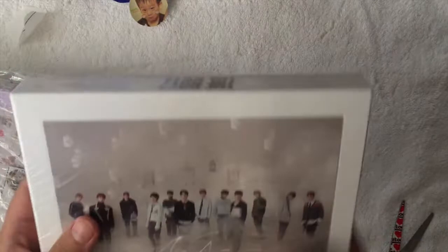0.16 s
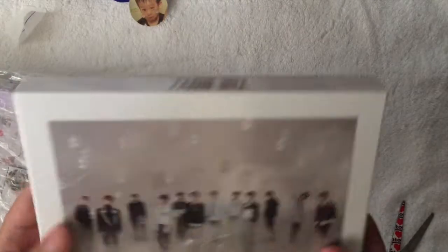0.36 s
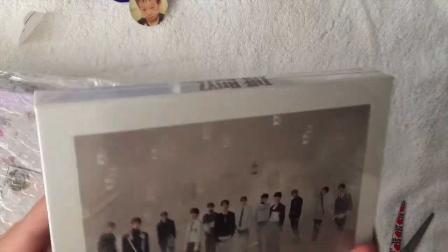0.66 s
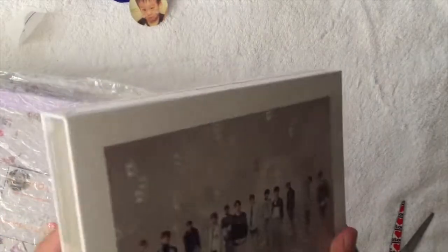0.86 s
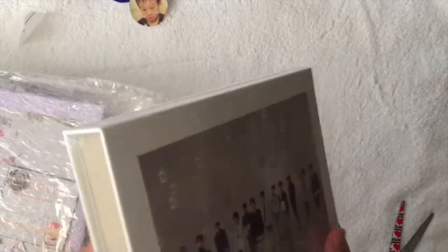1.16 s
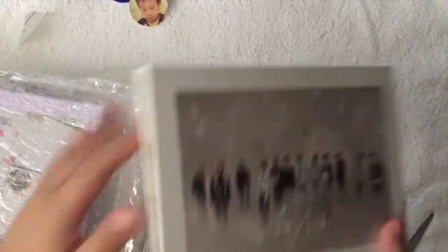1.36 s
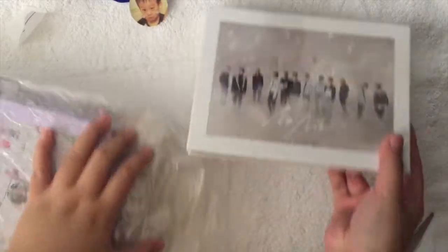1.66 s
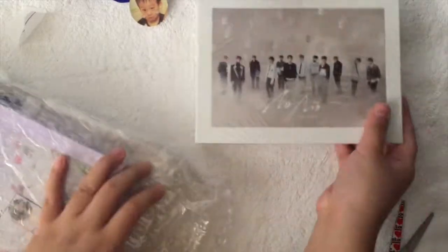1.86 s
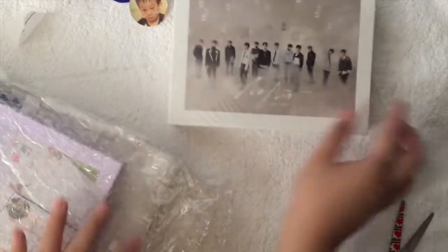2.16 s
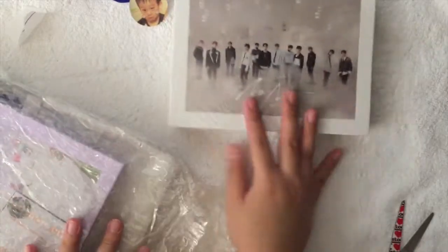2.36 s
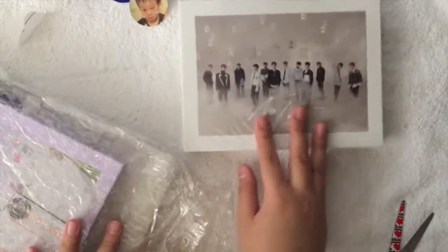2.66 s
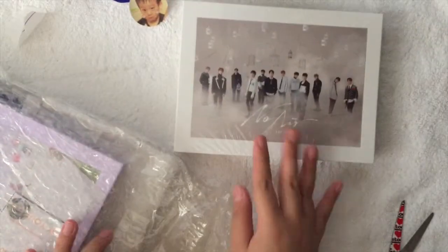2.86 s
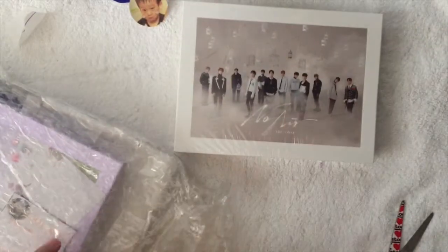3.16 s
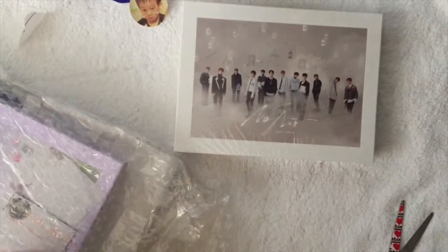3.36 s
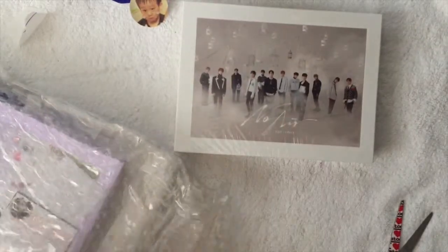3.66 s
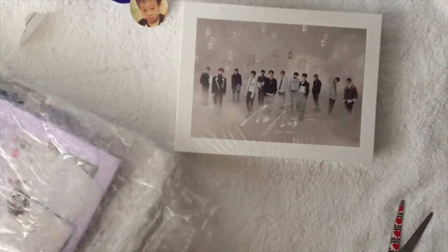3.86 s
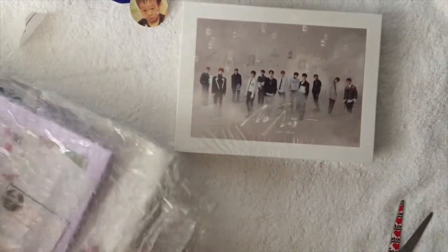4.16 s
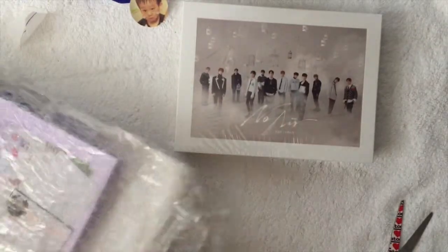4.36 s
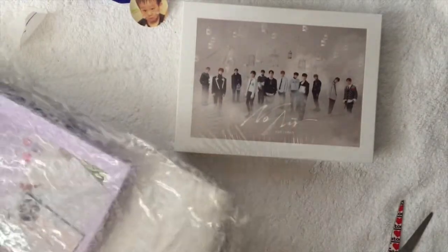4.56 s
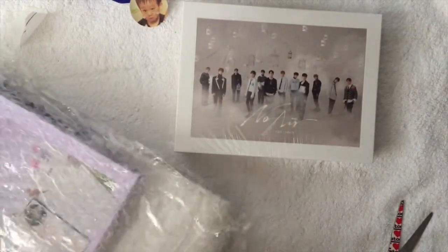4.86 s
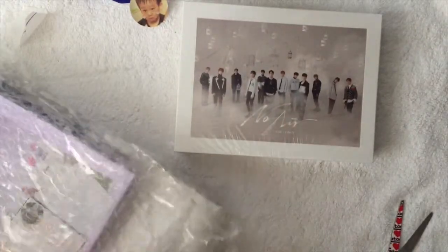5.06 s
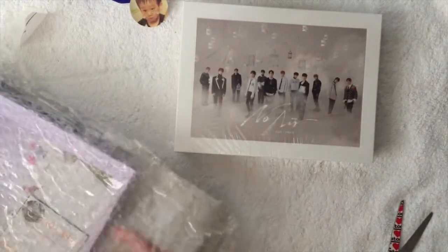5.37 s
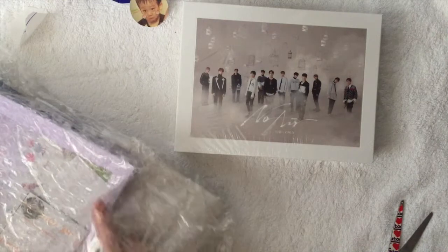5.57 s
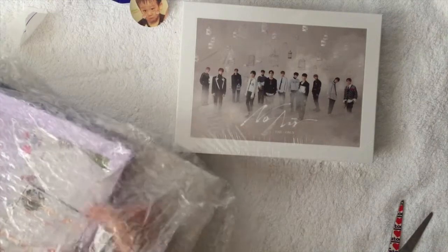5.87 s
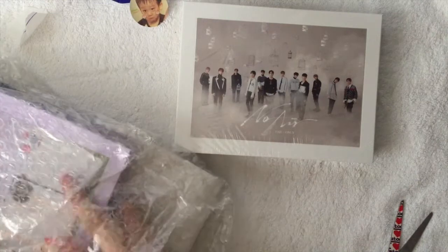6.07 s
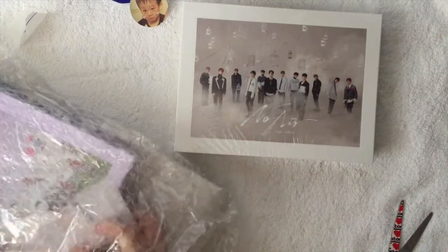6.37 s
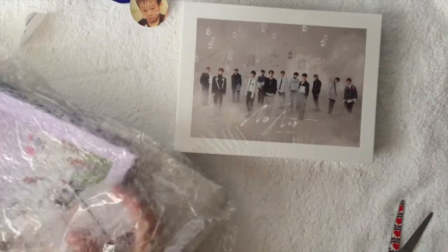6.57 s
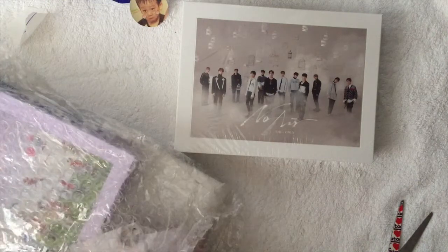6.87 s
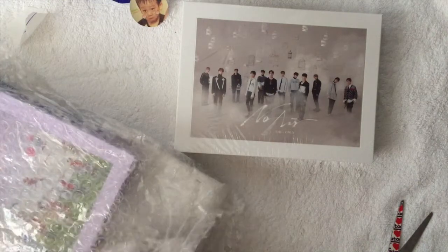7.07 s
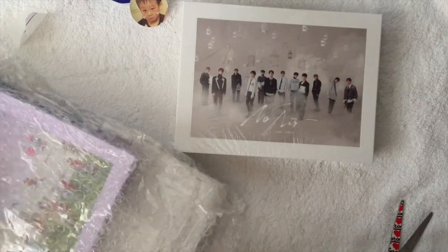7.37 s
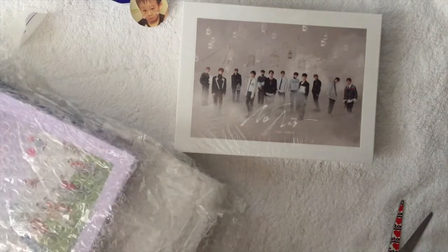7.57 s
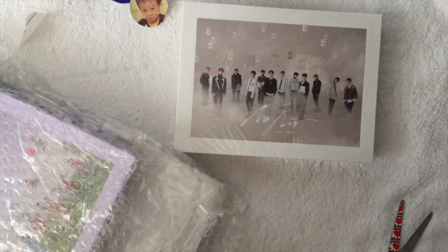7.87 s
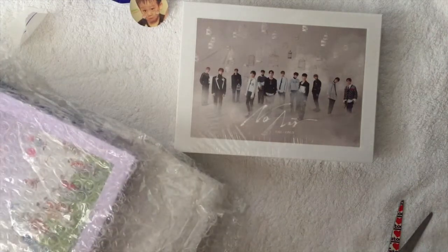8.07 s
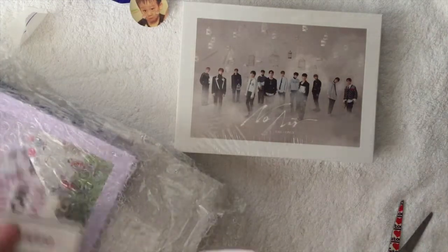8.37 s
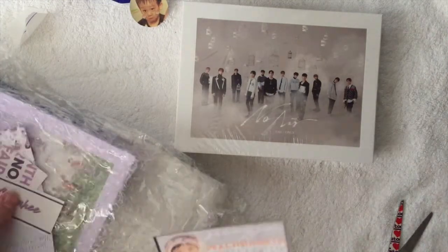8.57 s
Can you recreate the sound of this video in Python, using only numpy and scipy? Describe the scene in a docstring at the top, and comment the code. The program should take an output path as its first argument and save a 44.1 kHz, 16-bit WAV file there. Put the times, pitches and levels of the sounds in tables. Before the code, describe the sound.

Thin plastic crinkles close to the microphone in a small, quiet room. It begins softly, with fingers brushing a box wrapped in film, then turns into uneven bursts of louder crackling as a bag of parcels is searched. Creases tick, wider folds snap and the packages knock dully now and then. After a short lull come light scrapes and a last crinkle, over faint hum and hiss.

```python
"""Shrink-wrapped box and parcel bag

Hands turn and rub a shrink-wrapped box over a soft table cover, then rummage in a plastic bag of parcels.
The film buckles in thousands of tiny pops; wide folds snap, fine creases tick, parcels bump dully.
A small furnished room answers. A low rumble wavers over microphone hiss."""
import sys
import numpy as np
from scipy import signal
from scipy.fft import rfft, irfft, next_fast_len
from scipy.io import wavfile
from scipy.ndimage import uniform_filter1d, map_coordinates

SR = 44100
rng = np.random.default_rng(int(sys.argv[2]) if len(sys.argv) > 2 else 0)


def output_pcm(signal):
    """Save a mono or channel-first signal as 16-bit PCM at the path in sys.argv[1].

    Samples are clipped to [-1, 1] before scaling.
    """
    pcm = np.clip(np.atleast_2d(signal).T, -1, 1) * 32767
    wavfile.write(sys.argv[1], SR, np.round(pcm).astype(np.int16))


N = 384243

# rumble envelope (time [s], level [dB])
RUMBLE_LEVEL = [(0.0, -72), (0.09, -61.5), (0.41, -67.5), (0.61, -58.5), (0.72, -71.5), (1.79, -64.5),
                (2.15, -62), (2.64, -69), (2.95, -64.5), (4.19, -69), (5.0, -59.5), (5.85, -65.5),
                (6.1, -69.5), (7.66, -63.5), (7.74, -72), (7.84, -59.5), (8.22, -67.5), (8.27, -58),
                (8.71, -61)]
# background spectra (frequency [Hz], relative density [dB])
RUMBLE_SPECTRUM = [(25, -59), (40, -18), (52, -22), (59, -6.5), (66, -4), (78, -7), (95, -10.5),
                   (123, -9.5), (150, -17.5), (260, -38), (400, -76)]
HISS_SPECTRUM = [(120, -20.5), (200, 3.5), (373, -15.5), (791, -15), (933, -12), (1500, -39), (2170, -19),
                 (4860, -24), (6280, -48), (7540, -27.5), (12800, -31), (16000, -65)]
# room decay (frequency [Hz], T60 [s])
ROOM_T60 = [(200, 0.25), (2000, 0.059), (10000, 0.072)]
# parcel contacts (time [s], level [dB], pitch [Hz])
PARCEL_BUMPS = [(1.327, -53.5, 228), (1.554, -47, 355), (1.609, -47, 310), (2.108, -44.5, 134),
                (2.309, -52.5, 212), (2.418, -41.5, 194), (3.338, -48, 303), (3.59, -42, 322),
                (4.555, -42, 300), (5.03, -38, 288), (5.58, -38, 296), (5.736, -47.5, 129),
                (5.998, -48, 273), (6.16, -39, 288), (6.27, -39, 307), (6.626, -42.5, 340),
                (7.221, -47, 122), (7.489, -48, 325)]
# rubs and slides: fingers on the box, a stiffer packet near 7.15-7.6 s, a card sliding near 8.2-8.4 s (time
# [s], length [s], resonance [Hz], bandwidth [Hz], level [dB])
RUBS = [(0.121, 0.023, 2180, 900, -58.5), (0.242, 0.033, 990, 204, -69),
        (0.513, 0.036, 1800, 1220, -80), (0.667, 0.067, 925, 70, -62), (1.325, 0.08, 650, 302, -61),
        (1.335, 0.11, 1150, 400, -64.5), (7.152, 0.28, 3470, 1500, -62),
        (7.404, 0.18, 3440, 1100, -56), (7.793, 0.089, 6300, 1200, -68),
        (8.2, 0.14, 13800, 4000, -59), (8.253, 0.041, 2270, 350, -58), (8.255, 0.12, 1590, 160, -68),
        (8.251, 0.045, 5700, 1600, -54.5), (8.306, 0.048, 6100, 1500, -52),
        (8.332, 0.034, 2190, 400, -58.5), (8.393, 0.024, 2080, 350, -51),
        (8.433, 0.0088, 800, 250, -52), (8.606, 0.069, 3850, 1200, -52)]
# four rustle bands: wide folds, fine creases, crisp edge, bag air (frequency [Hz], relative density [dB])
FOLD_SPECTRUM = [(260, -10), (450, -30), (600, -4.5), (1010, -1), (1430, -2), (2040, 0), (2500, -7),
                 (3100, -13), (3900, -91)]
CREASE_SPECTRUM = [(2200, -41), (2800, -13), (3200, -6), (3760, 0), (4300, -2.5), (4850, -7.5), (5400, 1),
                   (6100, 0), (7000, -5), (7700, -27), (9000, -43)]
EDGE_SPECTRUM = [(4410, -14), (7500, -6.5), (8930, 2.5), (10300, -6.5), (11200, -2.5), (13800, -2.5),
                 (15700, -6), (16400, -42)]
AIR_SPECTRUM = [(88, -31), (150, -18), (200, -8.5), (290, 3), (381, -4), (520, -8.5), (680, -13.5),
                (1140, -120)]
# grips (time [s], hold [s], fold drive [dB], creases re folds [dB], edge re folds [dB], air re folds [dB])
FILM_GRIPS = [(0.0, 0.031, -68, 1, -7, 3), (0.11, 0.025, -70.5, 3.5, -5, 3),
              (0.272, 0.0065, -70.5, 2.5, -2, 6), (0.412, 0.0083, -75, -6, 3, 12.5),
              (0.525, 0.018, -74.5, -6, -18, -2), (1.344, 0.037, -77, -12, -21, 10.5),
              (1.569, 0.055, -53, -1, -2.5, -9), (1.675, 0.064, -47, -2.5, -9.5, -5),
              (1.753, 0.1, -53.5, -6.5, -15, -20), (1.834, 0.28, -62, 0, -4.5, -27),
              (2.087, 0.041, -60.5, -15, -19, -2.5), (2.355, 0.036, -62.5, -1, -9, -1),
              (2.405, 0.057, -50, -1, -3.5, -8), (2.481, 0.046, -48.5, -8, -15, -10),
              (2.623, 0.11, -70.5, -8, -10, -21), (2.795, 0.0088, -69, 3, -3, -8),
              (2.873, 0.071, -66, 1.5, 0.5, -4.5), (3.001, 0.091, -59.5, 2, -3.5, -6),
              (3.134, 0.16, -59.5, 3, -6, -14), (3.356, 0.063, -49, 2, 1, -4),
              (3.503, 0.11, -57, 0.5, 0, -4.5), (3.578, 0.16, -51.5, 3.5, 0.5, -5),
              (3.779, 0.04, -47, 1.5, -3.5, -9), (3.843, 0.07, -44, -3, -6.5, -13.5),
              (3.958, 0.15, -47.5, -0.5, -3.5, -6), (4.125, 0.032, -52.5, -6, -11, -19),
              (4.19, 0.15, -49.5, -3, -9.5, -7), (4.381, 0.06, -56, -4, -9, -13),
              (4.45, 0.064, -46, 0, -6, -13), (4.54, 0.056, -41.5, -2, -5.5, -7.5),
              (4.728, 0.19, -51, -1, -4.5, -10.5), (4.945, 0.03, -51.5, -2, -4, -29),
              (5.014, 0.1, -44, -2, -7, -13), (5.189, 0.17, -49, -1, -5.5, -14),
              (5.38, 0.1, -44.5, -0.5, -6.5, -12.5), (5.526, 0.0083, -48, 1.5, -10, -15),
              (5.572, 0.15, -50.5, 0, -3.5, -7.5), (5.733, 0.047, -59.5, 2, -5, -8),
              (5.827, 0.049, -53, 2.5, -5.5, -12), (5.945, 0.242, -52, 0, -7.5, -12.5),
              (6.198, 0.05, -67, 2, -7, -12), (6.281, 0.0083, -50, -3.5, -8, -13),
              (6.341, 0.075, -55, 1.5, -4, -22), (6.502, 0.21, -58.5, -0.5, -7.5, -7),
              (6.696, 0.09, -56.5, 1.5, -6, -25), (6.801, 0.14, -51, 0.5, -5.5, -21),
              (6.981, 0.0082, -59, -1, -8, -8), (7.101, 0.025, -64.5, -2.5, -8, -10),
              (7.167, 0.091, -51, -5, -11, -16), (7.282, 0.11, -56, -2.5, -9.5, -2.5),
              (7.43, 0.13, -56, -3, -2.5, -8.5), (7.801, 0.1, -72, -0.5, 1, 0),
              (8.126, 0.0047, -61, -0.5, -2.5, 3), (8.202, 0.047, -78, 11.5, 16.5, -12),
              (8.26, 0.015, -82, 9, 24, -17), (8.322, 0.025, -75.5, 17.5, 20.5, -17),
              (8.4, 0.012, -59.5, -9, -9, -2.5), (8.554, 0.028, -61.5, -4, -14, -2),
              (8.642, 0.021, -57, 4, -5, -14)]
# drive with the film at rest in the hands (folds [dB], creases [dB], edge [dB], air [dB])
REST_DRIVE_DB = [-82.5, -81, -87.5, -79.5]
# rustle balance (time [s], small re wide folds [dB])
FOLD_BALANCE = [(1.4, 13), (1.6, -7), (2.2, 5), (2.7, 5), (3.0, 17.5), (3.7, 16.5), (4.0, -9.5), (5.0, 3.5),
                (5.8, 3), (6.4, -6), (7.0, 7), (7.4, -4)]
# fine creases cracking (time [s], level [dB], ring [Hz], edge re level [dB])
CREASE_TICKS = [(0.4061, -41, 4100, -8), (0.5335, -61, 3900, -17), (0.751, -44.5, 3830, -16),
                (1.5543, -44, 6400, -9), (1.562, -36.5, 5800, -21), (1.6267, -36.5, 4250, -9),
                (1.654, -39, 6500, -12), (1.685, -31.5, 5470, -6.5), (1.6917, -32, 4550, -17),
                (1.7588, -38, 4360, -9), (1.7675, -29, 5500, -18), (1.786, -30, 5840, -10.5),
                (1.8984, -39.5, 3500, -12.5), (1.931, -37.5, 3820, -12), (1.9646, -31, 5300, -12),
                (1.9994, -37, 5240, -21), (2.018, -42, 5460, -18), (2.0876, -27, 4180, -13.5),
                (2.3426, -43, 4020, -23), (2.4175, -34, 6150, -10), (2.4496, -31, 4130, -8),
                (2.536, -38, 6000, -31), (2.607, -44, 5840, -23), (2.643, -47.5, 5770, -11),
                (2.6816, -45.5, 4330, -30), (2.877, -52, 4130, 4), (2.8807, -49, 4600, 6.5),
                (2.9068, -43, 3650, -3), (2.9886, -38, 4150, -27), (3.0018, -36, 5240, -26),
                (3.2198, -29.5, 6000, -26), (3.271, -39, 5700, -23), (3.348, -40, 5440, -18),
                (3.368, -34, 5570, -19), (3.499, -38, 5990, -19), (3.6804, -37, 6530, -12),
                (3.7205, -30, 5900, -7), (3.7284, -32, 6100, -13), (3.7768, -38, 3690, -22),
                (3.85, -27, 5800, -25), (3.924, -31, 5400, -13), (4.0482, -34.5, 5570, -18),
                (4.064, -37, 6040, -16), (4.102, -35, 6190, -7), (4.234, -32, 3820, -15),
                (4.309, -35, 3470, -8), (4.396, -35, 3730, -20), (4.47, -34, 5240, -5),
                (4.5566, -27, 3900, -8), (4.73, -37, 5900, -26), (4.7706, -52, 5600, -24),
                (5, -38, 5500, -2), (5.0552, -27, 3730, -13), (5.233, -42, 5560, -20),
                (5.376, -38, 3900, -4), (5.409, -36, 5500, -7), (5.4152, -24, 4060, -23),
                (5.527, -34, 6340, -21), (5.5798, -25.5, 6000, -19), (5.599, -30.5, 5860, -15),
                (5.8503, -38, 6200, -7), (5.933, -37, 4000, -16), (6.0114, -31.5, 3900, -7),
                (6.0547, -36, 5280, -18), (6.105, -33, 5940, -11), (6.114, -35, 3900, -6),
                (6.162, -31.5, 6300, -12), (6.2828, -39, 5660, -5), (6.357, -31.5, 5800, -14),
                (6.581, -36, 3940, -20), (6.6186, -30, 6170, -12), (6.731, -32, 5470, -12),
                (6.76, -35.5, 6610, -12), (6.8192, -36, 3780, -21), (6.86, -36, 6150, -20),
                (6.892, -31, 5530, -5), (6.976, -49, 5500, -10), (7.099, -53.5, 3900, -11),
                (7.176, -37, 5700, -15), (7.2186, -30, 6400, -36), (7.22, -22, 3770, -40),
                (7.234, -45, 6470, -22), (7.242, -47, 6000, -22), (7.308, -44, 4240, -26),
                (7.3357, -40, 5500, -22), (7.417, -46, 3700, -26), (7.486, -32, 3440, -27),
                (7.553, -38, 3650, -10), (8.3356, -48, 6200, 9), (8.6064, -48, 4070, -24),
                (8.6542, -38, 4400, -10), (8.64, -35.5, 4500, -24), (8.66, -30.5, 4470, -22),
                (8.6704, -32, 3360, -20)]
# taps on the box (rows before 0.3 s), then wide folds snapping (time [s], level [dB], pitch [Hz], after-ring
# [Hz], after-ring at 3 ms re level [dB])
FOLD_SNAPS = [(0.0305, -48, 1520, 770, -8.5), (0.0812, -46, 1980, 745, -2.5), (0.2765, -46, 2100, 960, -9),
              (0.407, -47.5, 1730, 1730, -13), (0.7528, -53, 1890, 1810, -2.5),
              (1.7684, -33.5, 1810, 920, -20), (1.7873, -34.5, 1630, 2150, -27),
              (1.9372, -36, 1600, 1220, -18), (1.9657, -41, 1500, 960, -18), (2.0893, -24, 1470, 914, -17),
              (2.4515, -39, 1860, 1040, -20), (2.4989, -26.5, 1530, 1030, -16.5),
              (2.8838, -47, 1520, 1440, -12), (3.003, -36.5, 1850, 2330, -18),
              (3.2206, -35.5, 1850, 1920, -23), (3.3496, -27, 1840, 1430, -18),
              (3.7761, -31, 1720, 1360, -24), (3.8508, -32, 1730, 2120, -18),
              (3.9048, -32, 1470, 1960, -20), (4.0008, -28, 1710, 1480, -13), (4.3159, -31, 1560, 940, -19),
              (4.4729, -22, 1210, 960, -10), (4.5583, -22.5, 1660, 1060, -8), (4.8617, -30, 1510, 790, -16),
              (5.0564, -26.5, 1330, 1340, -11), (5.0907, -27, 1370, 1040, -14),
              (5.2998, -28.5, 1400, 1060, -13), (5.366, -28.5, 1610, 1520, -11),
              (5.3862, -28, 1390, 1100, -13), (5.5831, -25, 1180, 810, -16.5),
              (5.6617, -35, 1710, 1570, -11), (6.0827, -35, 1640, 1640, -25),
              (6.273, -35.5, 1000, 780, -10.5), (6.2859, -38, 1440, 1470, -7),
              (6.3745, -34.5, 1400, 2060, -21), (6.5047, -44, 1470, 1310, -8),
              (6.5819, -37, 1580, 735, -13), (6.6203, -31.5, 1760, 1350, -18),
              (7.2201, -20, 1856, 950, -17.5), (7.238, -34, 1100, 1010, -14),
              (7.3096, -30.5, 1550, 1570, -16), (7.4879, -34.5, 1850, 2070, -9),
              (7.8663, -46.5, 1280, 1110, -11), (8.1218, -38, 1590, 1320, -11),
              (8.1256, -36, 1440, 2310, -16), (8.3952, -36.5, 1780, 1870, -17),
              (8.4023, -39, 1920, 2040, -7), (8.4066, -44, 2110, 1780, -21),
              (8.527, -38.5, 1450, 1060, -10)]


def amp(db):
    """dB to gain."""
    return 10 ** (np.asarray(db) / 20)


def unit(x):
    """Scale to rms 1."""
    return x / np.sqrt(np.mean(x ** 2) + 1e-20)


def columns(table):
    """Columns as vertical vectors, one row per event."""
    return np.transpose(table)[:, :, None]


def along(points, hz):
    """Interpolate (Hz, value) points over log frequency."""
    knots_hz, values = np.transpose(points)
    return np.interp(np.log(hz + 1), np.log(knots_hz + 1), values)


def curve(points):
    """Interpolate (s, value) points per sample."""
    return np.interp(np.arange(N) / SR, *np.transpose(points))


def wobble(rate_hz):
    """Smooth random curve, rate_hz knots per second."""
    knots = rng.standard_normal(int(N * rate_hz / SR) + 4)
    return map_coordinates(knots, [np.arange(N) * rate_hz / SR])


def coloured(x, spectrum):
    """Zero-phase spectral shaping, rms 1."""
    size = next_fast_len(len(x) + 8192)
    gain = amp(along(spectrum, np.fft.rfftfreq(size, 1 / SR)))
    return unit(irfft(rfft(x, size) * gain, size)[:len(x)])


def scatter(starts, bursts):
    """Sum bursts, one per row, at their start samples."""
    at = starts[:, None] + np.arange(bursts.shape[1])
    return np.bincount(at.ravel(), bursts.ravel(), N + SR)[:N]


def rumble(hum_hz=59, hum_re_noise_db=-2):
    """Low noise and a hum of wandering phase; the level wavers."""
    phase = 2 * np.pi * hum_hz * np.arange(N) / SR + 1.56 * wobble(10)
    hum = np.sqrt(2) * amp(hum_re_noise_db) * np.sin(phase)
    level_db = curve(RUMBLE_LEVEL) + 2.4 * wobble(5.5)
    return amp(level_db) * unit(hum + coloured(rng.standard_normal(N), RUMBLE_SPECTRUM))


def mic_hiss(level_db=-75):
    """Near-steady microphone noise."""
    return amp(level_db + 0.37 * wobble(14)) * coloured(rng.standard_normal(N), HISS_SPECTRUM)


def room(x, delay_samples=130):
    """Small-room reverb: each frequency dies at its own rate."""
    hz, t, noise = signal.stft(rng.standard_normal(SR // 2), SR, nperseg=256)
    decay = amp(-60 * t / along(ROOM_T60, hz)[:, None])
    tail = signal.istft(noise * decay, SR, nperseg=256)[1]
    return signal.fftconvolve(np.pad(x, (delay_samples, 0)), tail / np.linalg.norm(tail))[:N]


def parcel_bumps(rise_s=0.0011, decay_cycles=1.85):
    """Soft contacts: each a low push that dies in a few cycles."""
    time_s, db, hz = columns(PARCEL_BUMPS)
    t = np.arange(3000) / SR
    envelope = np.exp(-t * hz / decay_cycles) * (1 - np.exp(-t / rise_s))
    push = envelope * np.sin(2 * np.pi * hz * t)
    return scatter(np.round(time_s[:, 0] * SR).astype(int), amp(db + 3) * push)


def rubs():
    """Friction noise through one resonance; fast attack, slow fade."""
    out = np.zeros(N + SR)
    for time_s, length_s, hz, width_hz, db in RUBS:
        n = round(length_s * SR)
        progress = np.arange(n) / SR / length_s
        stroke = np.clip(progress / 0.039, 0, 1) * (1.5 - progress) / 1.72
        b, a = signal.iirpeak(hz, hz / width_hz, SR)
        friction = signal.lfilter(b, a, signal.lfilter(b, a, rng.standard_normal(SR // 2)))[-n:]
        out[round(time_s * SR):][:n] += amp(db) * stroke * unit(friction)
    return out[:N]


def grip_drives_db(rise_db_per_s=442, fall_db_per_s=648, creep_db_per_s=129):
    """Drive of folds, creases, edge and air: grips rise, hold and let go; the film creeps back."""
    t = np.arange(0, N + 64, 64) / SR
    time_s, hold_s, fold_db, *offsets_db = columns(FILM_GRIPS)
    released_s = np.maximum(t - time_s - hold_s, 0)
    held_db = fold_db - rise_db_per_s * np.maximum(time_s - t, 0)
    drives_db = []
    for rest_db, creep_db, offset_db in zip(REST_DRIVE_DB, (-10, -10.5, -13, -23), [0] + offsets_db):
        fall_db = np.maximum(-fall_db_per_s * released_s, creep_db - creep_db_per_s * released_s)
        power = amp(2 * rest_db) + amp(2 * (held_db + offset_db + fall_db)).sum(axis=0)
        drives_db.append(np.interp(np.arange(N) / SR, t, 10 * np.log10(power)))
    drives_db[3] += 3.5 * wobble(9.8)  # bag air puffs unevenly
    return drives_db


def balance_folds(x, crossover_hz=1460):
    """Handling shifts the balance of wide and small folds."""
    wide = signal.sosfilt(signal.butter(2, crossover_hz, fs=SR, output="sos"), x)
    small = signal.sosfilt(signal.butter(2, crossover_hz, "high", fs=SR, output="sos"), x)
    gain = amp(curve(FOLD_BALANCE) / 2)
    return wide / gain - small * gain


def patchy(x, depth_db):
    """Each crease rings its own way: random gain over time and frequency."""
    bins = signal.stft(x, nperseg=256)[2]
    field = uniform_filter1d(rng.standard_normal(bins.shape), size=3, axis=0)
    field = uniform_filter1d(field, size=6, axis=1)
    return signal.istft(bins * amp(depth_db * unit(field)), nperseg=256)[1][:N]


def film_flips(level_db, median_hz, width_cycles, count):
    """Bits of film flip at random: a cycle or two each, few big, many small."""
    when, rank, phase = columns(rng.random((count, 3)))
    hz = median_hz * np.exp(0.24 * rng.standard_normal((count, 1)))
    cycles = hz * np.arange(-80, 80) / SR
    strength = amp(-4 * np.log(np.maximum(rank, 0.12)))
    flips = strength * np.exp(-(cycles / width_cycles) ** 2) * np.sin(2 * np.pi * (cycles + phase))
    return amp(level_db) * unit(scatter((when[:, 0] * N).astype(int), flips))


def film_crackle(count=9000, pop_samples=200):
    """Random buckling over film-on-film sliding; each pop sounds in all four bands at random shares."""
    when, rank, width = rng.random((count, 3)).T
    starts = (when * N).astype(int)
    strength_db = -5.5 * np.log(np.maximum(rank, 0.08))  # few big, many small
    width_s = 0.00015 * amp(9.7 * width[:, None])
    age = np.arange(pop_samples) / SR / width_s
    swell = age ** 2 * np.exp(-(age / 1.53) ** 2)  # each tiny pop swells and fades softly
    clumping = amp(0.72 * wobble(30))
    drives_db = grip_drives_db()
    force = np.clip((drives_db[0][starts] + 72.5) / 22, 0.1, 1)  # light touch: even pops
    spectra = FOLD_SPECTRUM, CREASE_SPECTRUM, EDGE_SPECTRUM, AIR_SPECTRUM
    out = np.zeros(N)
    for spectrum, drive_db, slide_gain in zip(spectra, drives_db, (1.03, 0.76, 0.93, 2.9)):
        share_db = np.clip(3.2 * rng.standard_normal(count), -8, 3.5)
        gain = amp(force * (strength_db - 11.5 + share_db))[:, None]
        pops = unit(scatter(starts, gain * swell * rng.standard_normal((count, pop_samples))))
        slide = slide_gain * amp(1.24 * wobble(40)) * rng.standard_normal(N)
        band = coloured(clumping * (pops + slide), spectrum)
        if spectrum is FOLD_SPECTRUM:
            band = balance_folds(band)
        out += amp(drive_db - 4.5) * band
    out += film_flips(drives_db[0] - 7.5, median_hz=1450, width_cycles=0.5, count=1100)
    out += film_flips(drives_db[1] - 8, median_hz=5200, width_cycles=0.52, count=1300)
    return patchy(out, depth_db=2.5)


def crease_ticks(rise_s=0.00093, ring_t60_s=0.0026, spit_t60_s=0.0059, edge_t60_s=0.0031):
    """Fine creases crack: a short ring, a spit of noise around its pitch, a crisp edge."""
    time_s, db, hz, edge_db = columns(CREASE_TICKS)
    lead_samples = 90
    starts = np.round((time_s[:, 0] + 0.0009) * SR).astype(int) - lead_samples
    t = (np.arange(360) - lead_samples) / SR
    after_s = np.maximum(t, 0)
    onset = amp(db) * np.exp(np.minimum(t, 0) / rise_s)
    tone = np.sin(2 * np.pi * hz * t)
    ring = amp(-8 - 60 * after_s / ring_t60_s) * tone
    rough = unit(uniform_filter1d(rng.standard_normal(tone.shape), size=5, axis=1))
    spit = amp(-6 - 60 * after_s / spit_t60_s) * rough * tone
    edge_envelope = onset * amp(edge_db - 60 * after_s / edge_t60_s)
    edge = scatter(starts, edge_envelope * rng.standard_normal(tone.shape))
    return scatter(starts, onset * (ring + spit)) + np.std(edge) * coloured(edge, EDGE_SPECTRUM)


def fold_snaps(rise_s=0.00034, fall_s=0.0005, sag_s=0.00054, ring_t60_s=0.012, rattle_t60_s=0.027):
    """Wide folds flip: a cycle or two of sagging pitch, ringing air behind the fold, a weak rattle."""
    time_s, db, hz, ring_hz, ring_db = columns(FOLD_SNAPS)
    lead_samples = 60
    starts = np.round(time_s[:, 0] * SR).astype(int) - lead_samples
    elapsed_s = np.arange(900) / SR
    t = elapsed_s - lead_samples / SR
    after_s = np.maximum(t, 0)
    rise = np.exp(-(np.minimum(t, 0) / rise_s) ** 2)
    phase = 2 * np.pi * rng.random((len(time_s), 2))
    cycles = hz * (elapsed_s + 0.57 * sag_s * (1 - np.exp(-elapsed_s / sag_s)))  # pitch sags slightly
    flip = rise * np.exp(-after_s / fall_s) * np.sin(2 * np.pi * cycles + phase[:, :1])
    ring_envelope = amp(ring_db - 60 * (after_s - 0.003) / ring_t60_s) * (1 - np.exp(-after_s / 0.0011))
    ring = ring_envelope * np.sin(2 * np.pi * ring_hz * t + phase[:, 1:])
    rattle_envelope = rise * amp(db - 60 * after_s / rattle_t60_s)
    rattle = scatter(starts, rattle_envelope * rng.standard_normal(flip.shape))
    rattle = np.std(rattle) * coloured(rattle, FOLD_SPECTRUM)
    return scatter(starts, amp(db) * (flip + ring)) + amp(-16) * rattle


def scene():
    """Close film and parcels, room, background; mono."""
    near = film_crackle() + fold_snaps() + crease_ticks() + parcel_bumps() + rubs()
    return (near + amp(-12) * room(near) + rumble() + mic_hiss())[None]


def record(dry):
    """Microphone bass roll-off and recorder band limit."""
    low_cut_hz, top_hz = 41.4, 15900
    size = next_fast_len(N + SR // 2)
    hz = np.fft.rfftfreq(size, 1 / SR)
    response = (hz < top_hz) / np.sqrt(1 + (low_cut_hz / (hz + 1)) ** 8)
    return irfft(rfft(dry, size) * response, size)[:, :N]


dry = scene()
out = record(dry)
output_pcm(out)
```